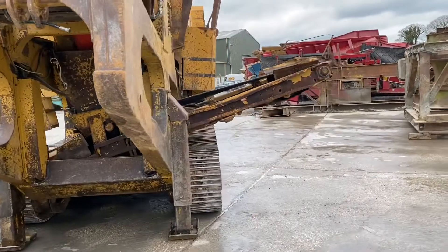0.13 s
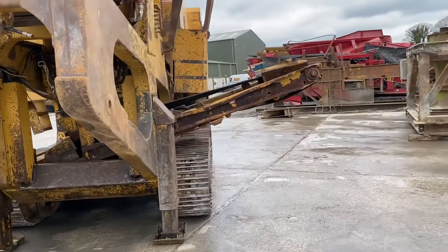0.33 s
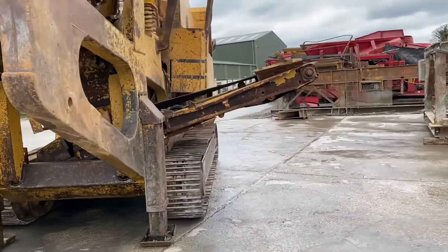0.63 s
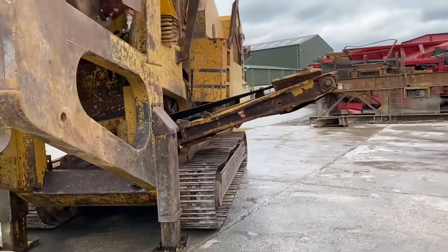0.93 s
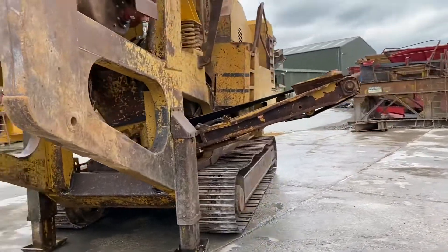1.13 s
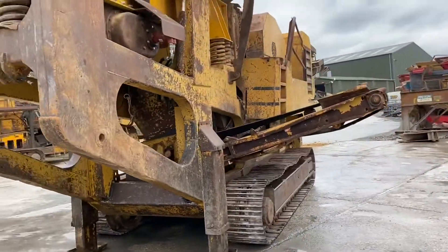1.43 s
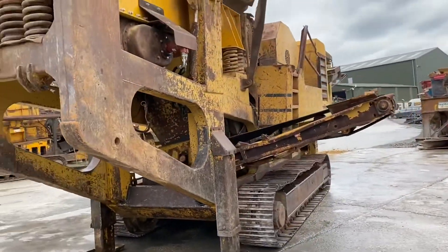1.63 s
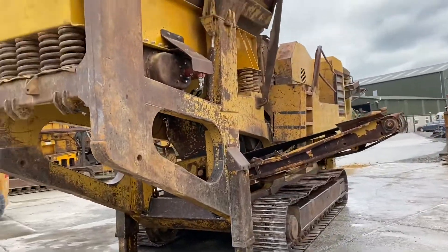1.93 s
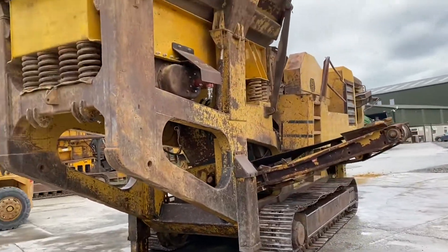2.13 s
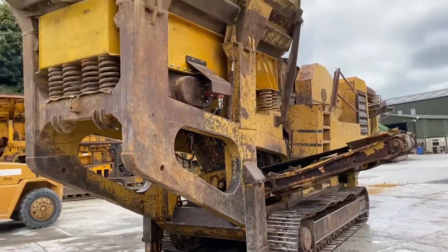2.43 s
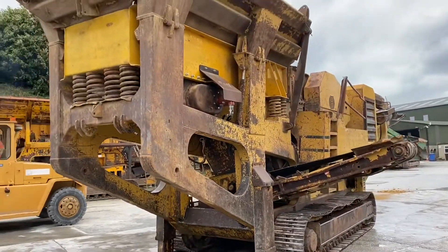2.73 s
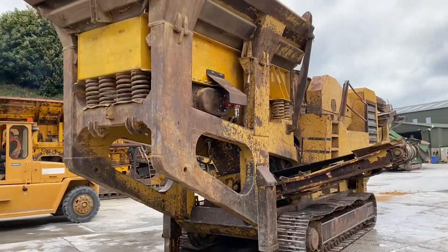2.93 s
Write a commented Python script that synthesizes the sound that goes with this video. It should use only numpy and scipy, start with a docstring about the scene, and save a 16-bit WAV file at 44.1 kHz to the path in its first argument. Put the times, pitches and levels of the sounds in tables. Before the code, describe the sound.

A rock crusher roars and shudders outdoors, with heavy uneven knocks ringing its steel plates.

```python
"""A rock crusher at work: heavy knocks land unevenly and set steel plates ringing.
The knocks are bursts of shaped noise that die away; the plates are fading sines driven by the clatter.
Under them the diesel and feeder hum in sums of cosines, and a wide noise roar shakes with the feeder.
Grit rattles and chips tick in short noise bursts; clanks, booms and stone squeaks are short tones."""
import sys
import numpy as np
from scipy import signal
from scipy.fft import rfft, irfft
from scipy.io import wavfile
from scipy.ndimage import uniform_filter1d

SR = 44100
rng = np.random.default_rng(int(sys.argv[2]) if len(sys.argv) > 2 else 0)


def transcribe(signal):
    """Save signal, clipped to [-1, 1], as a 16-bit WAV file at the path in sys.argv[1]."""
    frames = np.atleast_2d(signal).T
    limited = np.clip(frames, -1, 1)
    pcm = np.round(limited * 32767).astype(np.int16)
    wavfile.write(sys.argv[1], SR, pcm)


N = 136710  # length in samples

SHAKE_HZ = 18.1  # mean shake rate of the feeder
FRACTURES_PER_S, FRACTURE_SHARE = 480, 0.6  # mean rate; share of the power in a gritty blow
TICK_RISE_S, THUD_RISE_S = 0.0004, 0.0026
# how busy the machine sounds: t/s, bass level/dB, middle level/dB, treble level/dB
BUSY_LEVEL = [(0, 0.5, 6, 8), (.3, -1.5, 3, 8.5), (.5, 3, 4.5, 7.5), (.75, 2.5, 6, 9), (.9, 1, 0, 7.5),
              (1.05, 3, 11, 17.5), (1.22, 2.5, 6.5, 11), (1.42, 3.5, 4.5, 10.5), (1.56, -1, 6.5, 8.5),
              (1.7, 4, 7.5, 12), (1.88, 2, 7, 13.5), (2.05, 1.5, 5.5, 9), (2.22, 0, 1.5, 7.5),
              (2.4, 1, 1, 8.5), (2.55, 2.5, 4, 10.5), (2.75, 0, 5.5, 10), (2.9, -3, 4.5, 9),
              (3.1, 0.5, 3.5, 8)]
# ringing modes of the steel plates: f/Hz, relative level/dB, time to fall 60 dB/s
PLATE_MODES = [(655, 2, 0.17), (1144, 5.5, 0.38), (1419, -0.5, 0.82), (1650, 7, 0.16), (1880, 1, 0.16),
               (2185, 0, 0.91), (2630, -3, 0.61), (3140, -5.5, 0.22), (3710, -10, 0.26), (4140, -5, 0.26),
               (4787, -8, 0.42), (5240, -13, .3), (5841, -31, 0.47), (6640, -8, 0.39), (6750, -12, .15),
               (7400, -12, .15)]
# how strongly the plates sound: t/s, relative level/dB
PLATE_STRENGTH = [(0, -10), (.8, -1), (1.1, 8), (1.5, 2.5), (1.9, 0.5), (2.15, -14), (3.1, -16)]


def amp(db):
    """Turns decibels into a gain."""
    return 10 ** (np.asarray(db) / 20)


def evened(x):
    """Scales to an rms (average strength) of 1."""
    return x / np.sqrt(np.mean(x ** 2) + 1e-20)


def read(points, hz):
    """Reads a table between its points, on a log-frequency axis."""
    f, value = np.transpose(points)
    return np.interp(np.log(hz + 1), np.log(f + 1), value)


def add(mix, s, sound):
    """Mixes a sound in at time s, cut off at the end of the mix."""
    part = mix[..., max(round(s * SR), 0):][..., :sound.shape[-1]]
    part += sound[..., :part.shape[-1]]


def coloured(x, spectrum):
    """Filters x to the levels of a spectrum table and scales to rms 1."""
    size = x.shape[-1]
    gain = amp(read(spectrum, np.fft.rfftfreq(size, 1 / SR)))
    return evened(irfft(rfft(x) * gain, size))


def noise(spectrum, size=N):
    """Makes two unrelated noises of one colour."""
    return coloured(rng.standard_normal((2, size)), spectrum)


def smooth_random(shape, rate):
    """Makes random curves of rms 1 with little movement faster than rate in Hz."""
    size = shape[-1]
    gain = np.exp(-(np.fft.rfftfreq(size, 1 / SR) / rate) ** 2)
    return evened(irfft(rfft(rng.standard_normal(shape)) * gain, size))


def drift(rate):
    """Makes one smooth random curve as long as the scene."""
    return smooth_random((N,), rate)


def strike(rise, t60, size=14000):
    """Loudness of a blow: quick straight rise, then exponential decay."""
    t = np.arange(size) / SR
    return np.minimum(t / rise, 1) * amp(-60 * np.maximum(t - rise, 0) / t60)


def blows(rows, spectrum, rise, t60, gritty=0):
    """Each (s, dB) blow is a noise burst that dies away; a share of it is separate small fractures."""
    power, shape = np.zeros(N), strike(rise, t60)
    for s, db in rows:
        add(power, s, (amp(db) * shape) ** 2)
    snaps = (rng.random(N) < FRACTURES_PER_S / SR) * rng.choice([-1., 1.], (2, N))
    snaps = coloured(snaps, spectrum)
    texture = np.sqrt(1 - gritty) * noise(spectrum) + np.sqrt(gritty) * snaps
    return np.sqrt(power) * texture


def tones(rows, rise, t60, size=14000):
    """Each (s, Hz, dB) row sounds one mode: a sine that rises quickly and dies away."""
    out, shape = np.zeros(N), strike(rise, t60, size)
    t = np.arange(size) / SR
    for s, hz, db in rows:
        add(out, s, amp(db) * shape * np.sin(2 * np.pi * (hz * t + rng.random())))
    return out


def shaft(hz, wander):
    """Angle of a shaft whose speed wanders a little."""
    return 2 * np.pi * np.cumsum(hz * (1 + wander * drift(3.0))) / SR


def hum(angle, orders):
    """A turning shaft hums at multiples of its rate, each wavering in level."""
    waver_db, waver_hz = 2.5, 5
    total = np.zeros(N)
    for k, db in orders:
        level = db + waver_db * (drift(waver_hz) - 2)  # wavers about a level 5 dB below the table
        total += np.sqrt(2) * amp(level) * np.cos(k * angle + 2 * np.pi * rng.random())
    return total


def drone(shake):
    """The diesel's crankshaft and the shaking feeder hum together."""
    crank_hz, crank_wander = 31.66, 0.0037
    # hum of the diesel: multiple of the crank rate, relative level/dB
    crank_orders = [(2, -60), (3, -24), (6, -30.5), (8, -30.5), (10, -36.5), (13, -36.5)]
    # hum of the feeder: multiple of the shake rate, relative level/dB
    feeder_orders = [(1, -84), (3, -28.5), (4, -31.5)]
    return hum(shaft(crank_hz, crank_wander), crank_orders) + hum(shake, feeder_orders)


def roar(shake):
    """Patchy noise of tumbling stone, fan and belts, pulsing slightly with the feeder."""
    roar_db, shake_depth = -19.5, 0.062
    # colour of the roar: f/Hz, relative level per Hz/dB
    roar_colour = [(15, -59), (25, -36), (36, -39), (56, -4), (100, -1.5), (135, -3.5), (185, 2), (242, -7),
                   (310, -4), (380, -7.5), (536, -17), (700, -15), (1000, -19.5), (1480, -28),
                   (2450, -31.5), (3300, -40), (5000, -45), (7000, -52), (10500, -53), (13000, -54),
                   (15000, -72), (16000, -77)]
    # unevenness, least in the bass: f/Hz, rms level change/dB
    unevenness = [(300, .5), (1200, 1.6), (5000, 2.2)]
    hz, t, z = signal.stft(noise(roar_colour), SR, nperseg=1024, noverlap=768)
    when, *levels = np.transpose(BUSY_LEVEL)
    level = 0
    for row, db in zip(np.eye(3), levels):  # bass, middle and treble blend into each other
        share = np.interp(np.log(hz + 1), np.log([200, 1200, 5000]), row)
        level = level + np.outer(share, np.interp(t, when, db))
    patches = uniform_filter1d(rng.standard_normal(level.shape), size=9, axis=0)  # smooth over pitch
    patches = evened(uniform_filter1d(patches, size=7, axis=1))  # smooth over time
    z = z * amp(level + read(unevenness, hz)[:, None] * patches)
    sound = signal.istft(z, nperseg=1024, noverlap=768)[1][:, :N]
    return amp(roar_db) * sound * (1 + shake_depth * np.cos(shake))


def throb(shake):
    """The load drops back on the feeder once a shake: a low noise burst each time."""
    throb_db, fade_s = -27, 0.01  # fade_s: time to fall to 1/e
    # body of the feeder: f/Hz, relative level per Hz/dB
    feeder_body = [(50, -38), (90, 2), (150, -2.5), (185, 4), (250, -4), (350, -6), (600, -16), (1500, -41),
                   (4000, -65), (16000, -100)]
    since = (shake / (2 * np.pi) % 1) / SHAKE_HZ  # seconds since the last drop
    shape = np.minimum(since / THUD_RISE_S, 1) * np.exp(-since / fade_s)
    return amp(throb_db) * evened(noise(feeder_body) * shape)


def grit(shake):
    """Small stones hop on the feeder at random, most often at one point of each shake."""
    hops_per_s, spread_db, grit_db, t60, spots = 110, -2, -30, 0.13, 16
    # colour of a hop: f/Hz, relative level per Hz/dB
    grit_colour = [(200, 16), (600, -9), (2200, -8), (4000, -22.5), (10000, -74), (16000, -38)]
    out = np.zeros((2, N))
    hops = rng.random(N) < hops_per_s / SR * (1 + np.cos(shake))
    hops = hops * amp(spread_db * np.minimum(rng.exponential(1, N), 3))
    spot = rng.integers(0, spots, N)
    for k in range(spots):  # each spot has its own burst
        burst = noise(grit_colour, 4000) * strike(TICK_RISE_S, t60, 4000)
        out += signal.oaconvolve((hops * (spot == k))[None], burst)[:, :N]
    return amp(grit_db) * evened(out)


def clanks():
    """Stones bump the steel at random and wake short modes, stronger while the chamber is busy."""
    clanks_per_s, spread_db, clank_db, rise, t60 = 260, 2.5, -28, 0.0033, 0.14
    # strength of the modes by pitch: f/Hz, relative level/dB
    clank_strength = [(160, 2), (330, 3.5), (600, -4), (1200, -5), (2000, -13), (3000, -16.5)]
    draws = rng.random((round(clanks_per_s * N / SR), 3))
    s = draws[:, 0] * N / SR
    low, high = clank_strength[0][0], clank_strength[-1][0]
    hz = low * (high / low) ** np.sqrt(draws[:, 1])  # more of them at high pitches
    when, _, busy, _ = np.transpose(BUSY_LEVEL)
    extra_db = spread_db * np.minimum(-np.log(1 - draws[:, 2]), 2)
    db = read(clank_strength, hz) + np.interp(s, when, busy) + extra_db
    rows = np.transpose([s, hz, db])
    pair = np.array([tones(rows[k::2], rise, t60, 5000) for k in range(2)])
    return amp(clank_db) * evened(pair)


def booms():
    """The hopper booms in low sines that swell quickly and die away."""
    # low booms: t/s, f/Hz, level/dB
    boom_rows = [(0.161, 71, -12), (.38, 72, -14), (.55, 67, -22), (.6, 189.7, -13), (.775, 191, -8.5),
                 (.82, 258, -16), (.94, 160, -13.5), (1.01, 86.4, -9), (1.06, 109, -12),
                 (1.47, 180.7, -10.5), (1.69, 97, -21), (1.77, 180, -14), (2.28, 95.5, -8),
                 (2.48, 101, -11.5), (2.643, 246, -19), (2.71, 85, -14.5), (2.88, 63, -11),
                 (2.96, 77, -11.5)]
    return tones(boom_rows, rise=0.016, t60=0.24)


def slip(length, from_hz, to_hz, waver):
    """Stone sticks and slips on steel: a rough, wavering tone that swells and stops."""
    rise_s, waver_hz, rough_db = 0.006, 120, 4
    t = np.arange(0, length, 1 / SR)
    bend, grip = smooth_random((2, 8192), waver_hz)[:, :len(t)]
    hz = from_hz * (to_hz / from_hz) ** (t / length) * (1 + waver * bend)
    shape = np.minimum(t / rise_s, 1) * (1 - (t / length) ** 2) * evened(amp(rough_db * grip))
    return shape * np.sin(2 * np.pi * np.cumsum(hz) / SR)


def squeaks():
    """Stones rub the plates: clear squeaks, faint chirps on the high modes and one rising scrape."""
    waver = 0.005  # rms share of the pitch
    chirps_per_s, chirp_s, chirps_above_hz, chirp_db = 50, 0.028, 3500, -45.5  # chirp_s: mean length
    # stone on steel: t/s, length/s, f/Hz, level/dB
    squeak_rows = [(0.388, .025, 6740, -42), (.815, 0.037, 6360, -34), (1.082, 0.078, 6500, -40),
                   (1.094, .045, 3746, -28.5), (1.202, 0.023, 6760, -33), (1.227, .025, 6480, -33),
                   (1.277, 0.024, 6480, -40), (1.338, 0.037, 6520, -38), (1.379, 0.041, 4780, -32.5),
                   (1.39, .04, 3800, -39), (1.42, 0.062, 4800, -36), (1.63, 0.067, 4170, -38),
                   (1.7, 0.049, 4340, -39), (1.826, .022, 6480, -39), (1.874, .03, 6696, -35),
                   (1.909, 0.085, 4190, -32), (1.922, 0.033, 7558, -39), (2.52, 0.034, 4470, -37)]
    out = np.zeros((2, N))
    for s, length, hz, db in squeak_rows:
        add(out[0], s, amp(db) * slip(length, hz, hz, waver))
    high = [hz for hz, _, _ in PLATE_MODES if hz > chirps_above_hz]
    for when, mode, size, side in rng.random((round(chirps_per_s * N / SR), 4)):
        s, hz = when * N / SR, high[int(mode * len(high))]
        db = chirp_db + np.interp(s, *np.transpose(PLATE_STRENGTH))
        add(out[int(2 * side)], s, amp(db) * slip(chirp_s * (0.5 + size), hz, hz, waver))
    scrape = slip(0.035, from_hz=1800, to_hz=2980, waver=0.072)
    add(out[0], 2.867, amp(-28) * scrape)
    return out


def ticks():
    """Stone chips tick: sharp, bright noise bursts."""
    # t/s, level/dB
    tick_rows = [(.212, -39.5), (.378, -37), (.678, -41), (.772, -28), (.843, -31), (.869, -29), (.95, -35),
                 (.977, -36), (1.012, -24.5), (1.085, -30), (1.177, -31), (1.215, -48), (1.233, -36),
                 (1.455, -38), (1.49, -35), (1.563, -42), (1.68, -29.5), (1.842, -41), (2.014, -46),
                 (2.27, -31), (2.302, -33), (2.446, -34), (2.476, -34), (2.51, -33), (2.698, -37)]
    # f/Hz, relative level per Hz/dB
    tick_colour = [(2500, -42), (6000, 8), (7500, 1), (11000, 12), (13500, -8), (16000, 2)]
    return blows(tick_rows, tick_colour, TICK_RISE_S, t60=0.057)


def clinks():
    """Chips clink on a small steel part: very short bursts around a narrow band."""
    # t/s, level/dB
    clink_rows = [(1.012, -29), (1.177, -38), (1.362, -40), (1.888, -33), (2.175, -39), (2.343, -30.5),
                  (2.51, -19.5)]
    # f/Hz, relative level per Hz/dB
    clink_colour = [(3000, -33), (6100, -18), (6800, 4), (7150, -2), (7700, -43), (12000, -38)]
    return blows(clink_rows, clink_colour, TICK_RISE_S, t60=0.038)


def clacks():
    """Stone meets stone with a short, narrow resonance, made of noise around one pitch."""
    octaves = 0.18  # distance from the pitch at which the noise is 3 dB down
    # pitched clacks: t/s, f/Hz, level/dB
    clack_rows = [(.118, 2340, -28), (.384, 3880, -35), (.871, 2100, -22.5), (0.929, 2600, -27),
                  (1.368, 1790, -23.5), (1.512, 4000, -29.5), (1.612, 2190, -24), (1.879, 1450, -29),
                  (2.27, 1500, -20), (2.31, 2600, -26), (2.322, 4000, -35), (2.348, 2300, -29),
                  (2.443, 3030, -29.5), (2.448, 1410, -22), (2.535, 2450, -32), (2.644, 700, -21),
                  (2.645, 1300, -23), (2.646, 2130, -25.5), (2.805, 2400, -28), (2.812, 3770, -29),
                  (2.824, 4500, -36), (2.818, 1170, -23), (2.859, 1060, -29), (2.869, 1970, -20.5),
                  (2.889, 3200, -31), (3.012, 4270, -33)]
    out = np.zeros((2, N))
    for s, hz, db in clack_rows:
        band = [(hz * 2 ** (octaves * k), -3 * k * k) for k in range(-4, 5)]
        add(out, s, amp(db) * strike(rise=0.00061, t60=0.094) * noise(band, 14000))
    return out


def plates(clatter):
    """Steel plates ring in fading sines, driven by the force of the clatter."""
    plate_db = -37
    t = np.arange(SR // 2) / SR
    strength = amp(np.interp(np.arange(N) / SR, *np.transpose(PLATE_STRENGTH)))
    drive = abs(clatter) * strength * rng.standard_normal((2, N))
    ring = np.zeros(len(t))
    for hz, db, t60 in PLATE_MODES:
        ring += amp(db) * evened(amp(-60 * t / t60) * np.sin(2 * np.pi * hz * t))
    return amp(plate_db) * evened(signal.fftconvolve(drive, ring[None])[:, :N])


def knocks():
    """Thud of the frame, clatter of the chamber and crack of the stone; the plates ring on."""
    thud_db, clatter_db, crack_db = -7, -10.5, 1.5  # added to the levels of each knock
    # stone in the chamber: t/s, clatter level/dB, thud level/dB, crack level/dB
    knock_rows = [(0.115, -27, -11.5, -40.5), (0.33, -9.5, -15.5, -42), (0.378, -16.5, -38, -41),
                  (0.519, -17.5, -43, -40), (0.677, -14, -21, -38.5), (0.768, -6, -8, -25),
                  (0.791, -11, -3.5, -34), (0.825, -9, -6.5, -38), (0.844, -22, -18, -34.5),
                  (0.869, -12, -11, -34.5), (0.943, -7.5, -4.5, -39), (0.992, -6, -4, -51),
                  (1.014, -12.5, -24, -34), (1.153, -7, -10.5, -48), (1.2, -11, -12, -34.5),
                  (1.253, -19, -15, -40), (1.305, -14, -27, -44), (1.366, -13.5, -17, -39),
                  (1.481, -7.5, -5.5, -37), (1.511, -20, -27, -36), (1.602, -8, -5.5, -30),
                  (1.652, -8, -14, -30), (1.774, -10.5, -10, -45), (1.82, -8.5, -9, -36),
                  (1.869, -9, -19, -39), (2.004, -11.5, -10, -33), (2.264, -9, -11, -28.5),
                  (2.288, -11, -5.5, -38), (2.304, -14, -23, -37), (2.345, -13.5, -33, -57),
                  (2.439, -10.5, -35, -39), (2.498, -8.5, -5.5, -33.5), (2.643, -18, -8.5, -39),
                  (2.804, -9.5, -15, -39), (2.868, -16.5, -33, -40.5), (3, -15, -29, -37)]
    # colours of the three parts: f/Hz, relative level per Hz/dB
    thud_colour = [(40, -38), (90, 1), (180, 3), (330, 3.5), (520, -8.5), (1000, -54)]
    clatter_colour = [(250, -10), (550, 3.5), (1100, -1), (1600, -6.5), (2400, -8.5), (3400, -18),
                      (6000, -41)]
    crack_colour = [(1500, -26), (2800, 2), (4200, 6.5), (5600, 2), (7000, -1), (10500, -4), (13000, -6),
                    (16000, -40)]
    rows = np.array(knock_rows)
    thud = amp(thud_db) * blows(rows[:, [0, 2]], thud_colour, THUD_RISE_S, t60=0.34)
    clatter = amp(clatter_db) * blows(
        rows[:, [0, 1]], clatter_colour, rise=0.009, t60=0.32, gritty=FRACTURE_SHARE)
    crack = amp(crack_db) * blows(
        rows[:, [0, 3]], crack_colour, rise=0.0052, t60=0.25, gritty=FRACTURE_SHARE)
    return thud + clatter + crack + plates(clatter)


def microphones(pair):
    """Two close ports: alike in the bass, less alike in the middle, offset in phase higher up."""
    # f/Hz, likeness of the ports (0 to 1)
    likeness = [(60, .99), (130, .97), (290, .9), (640, .66), (1400, .55), (3100, .55), (5500, .35),
                (7000, .75), (9000, .88), (15000, .88)]
    # f/Hz, phase by which left leads/rad
    left_lead = [(20, 0), (250, 0), (780, .6), (2150, .4), (2840, .8), (4200, 0), (7100, 0), (8900, -3.14),
                 (11200, -6.28), (13100, -9.42), (15300, -12.57)]
    # f/Hz, left minus right level/dB
    left_tilt = [(60, -1.0), (150, -1), (380, -0.5), (950, 3.5), (2380, 1.5), (5980, 1.0), (10000, 0)]
    hz = np.fft.rfftfreq(N, 1 / SR)
    a, b = rfft(pair)
    same, tilt = np.clip(read(likeness, hz), 0, 1), read(left_tilt, hz) / 2
    mid = a * np.sqrt((1 + same) / 2)  # shared by both ports
    side = b * np.sqrt((1 - same) / 2)  # opposite in the two ports
    left = (mid + side) * amp(tilt)
    right = (mid - side) * amp(-tilt) * np.exp(-1j * read(left_lead, hz))
    return irfft(np.array([left, right]), N)


def scene():
    """Engine, feeder and crushing together; drone and booms are the same in both channels."""
    shake = shaft(SHAKE_HZ, wander=0.007)
    machine = roar(shake) + throb(shake) + grit(shake)
    stones = clanks() + squeaks() + ticks() + clinks() + clacks() + knocks()
    return drone(shake) + booms() + microphones(machine + stones)


def record(dry):
    """Rounds off the highest peaks, then removes the top treble."""
    ceiling, edge_hz = 0.95, 15700
    rounded = dry / (1 + (dry / ceiling) ** 6) ** (1 / 6)
    low_pass = signal.firwin(511, edge_hz, window=("kaiser", 9), fs=SR)
    return signal.oaconvolve(rounded, low_pass[None], "same")


dry = scene()
out = record(dry)
transcribe(out)
```